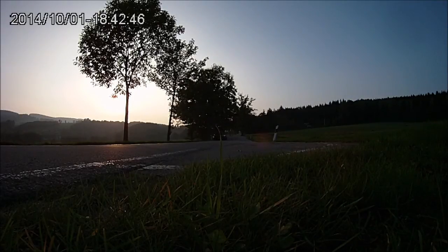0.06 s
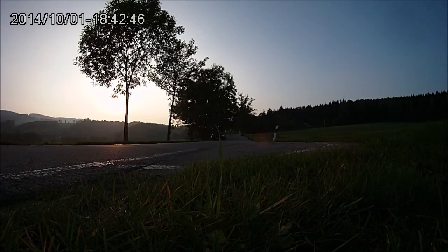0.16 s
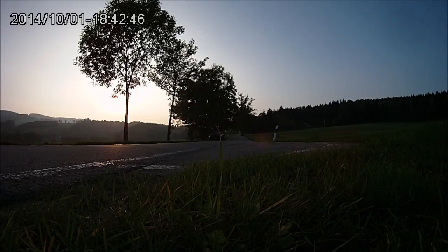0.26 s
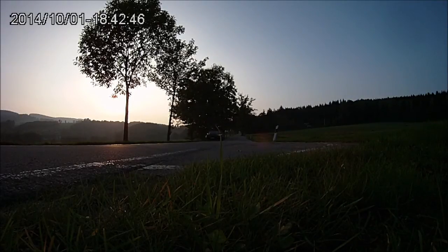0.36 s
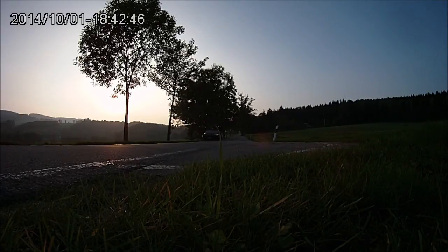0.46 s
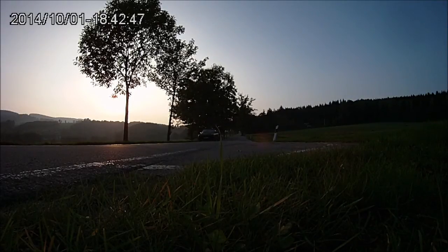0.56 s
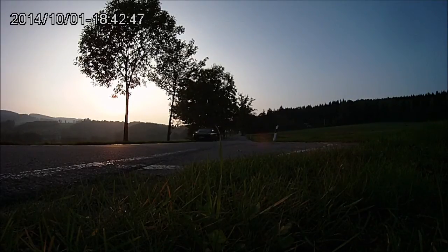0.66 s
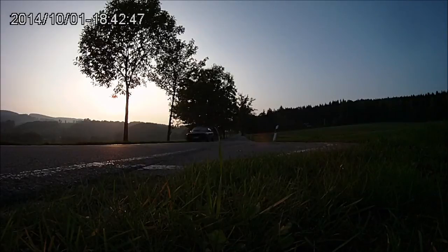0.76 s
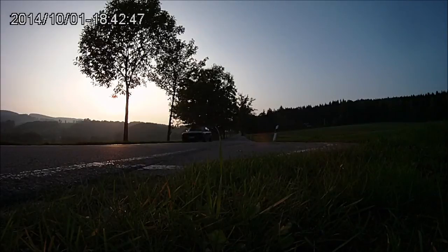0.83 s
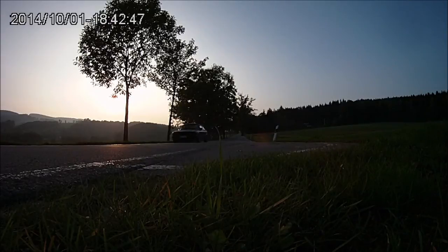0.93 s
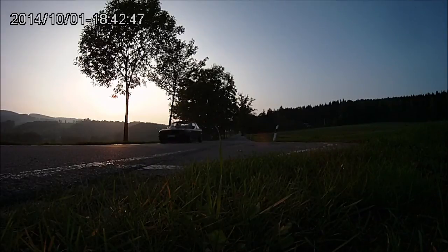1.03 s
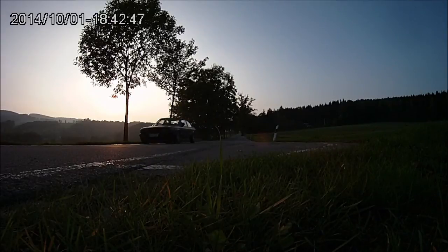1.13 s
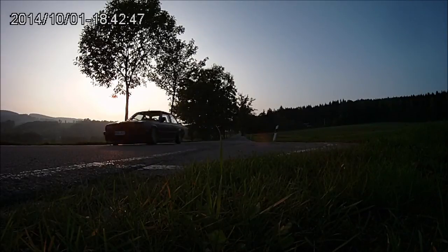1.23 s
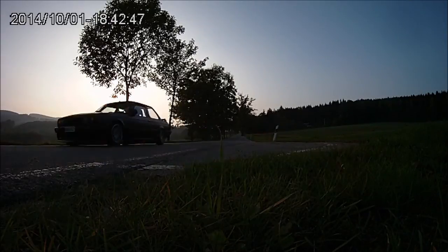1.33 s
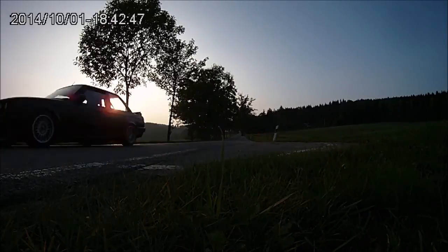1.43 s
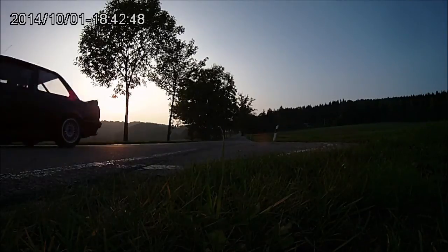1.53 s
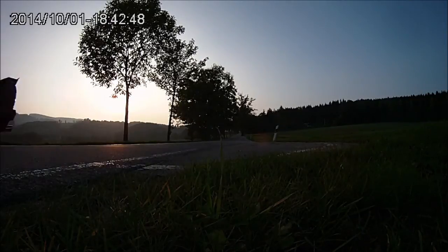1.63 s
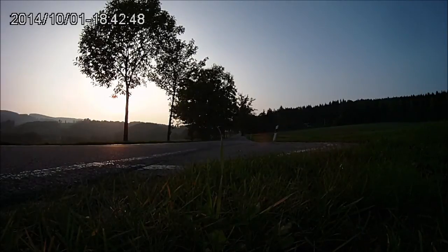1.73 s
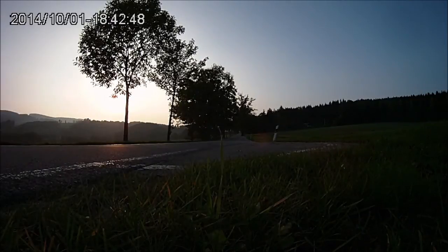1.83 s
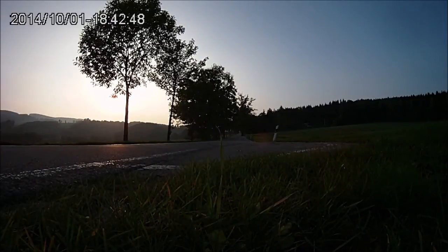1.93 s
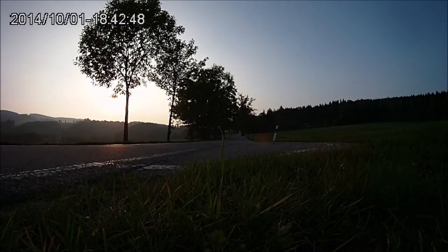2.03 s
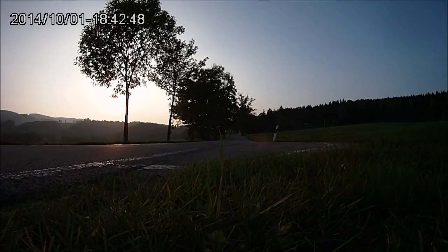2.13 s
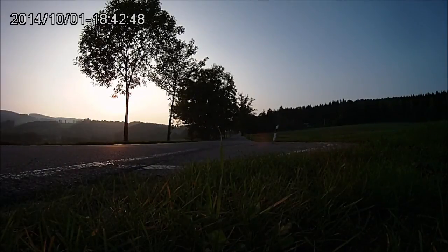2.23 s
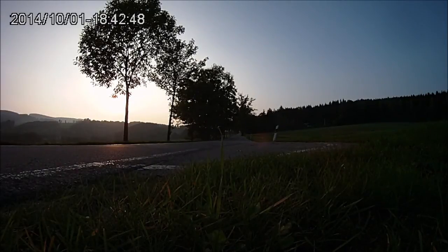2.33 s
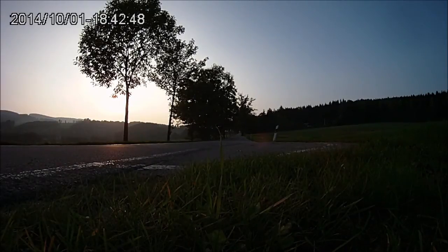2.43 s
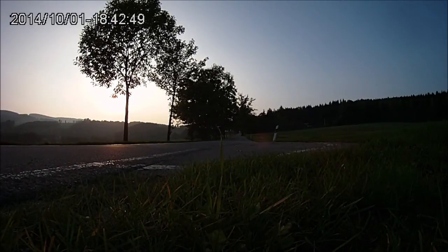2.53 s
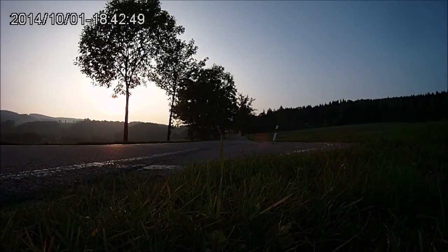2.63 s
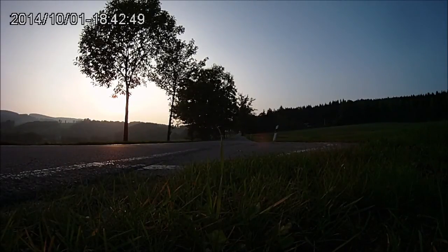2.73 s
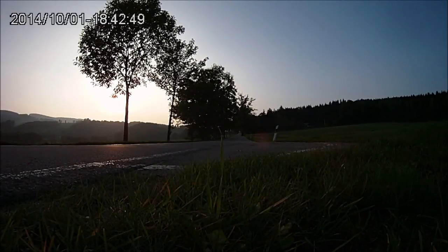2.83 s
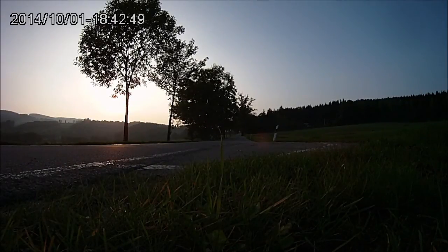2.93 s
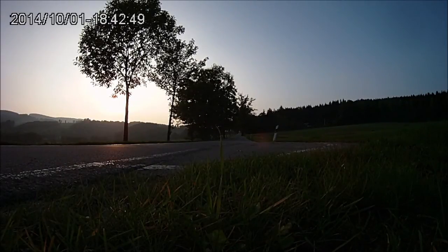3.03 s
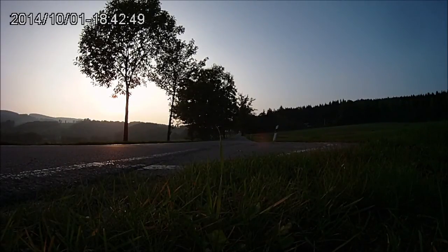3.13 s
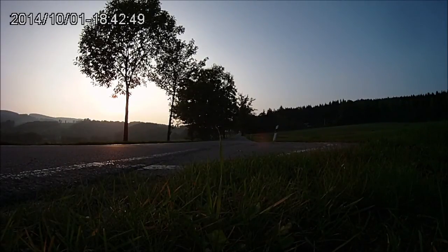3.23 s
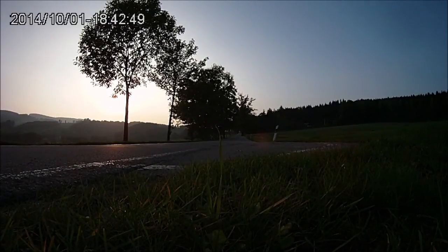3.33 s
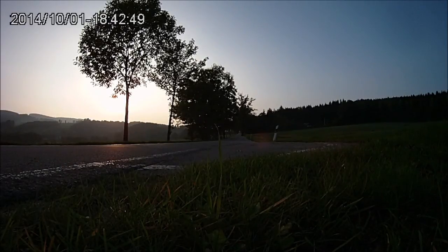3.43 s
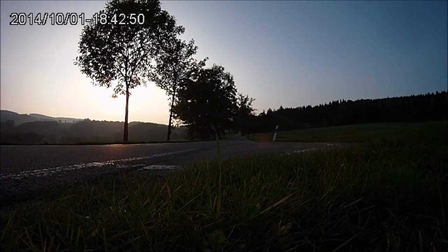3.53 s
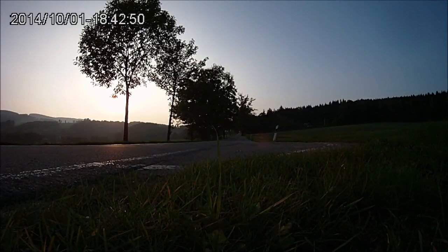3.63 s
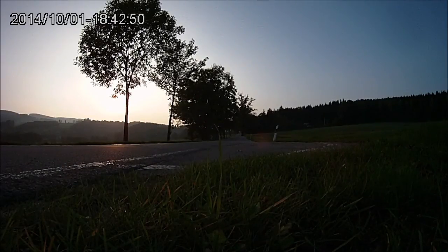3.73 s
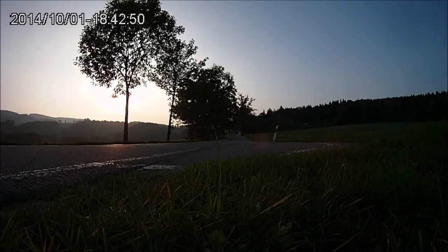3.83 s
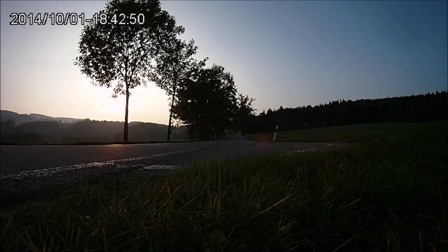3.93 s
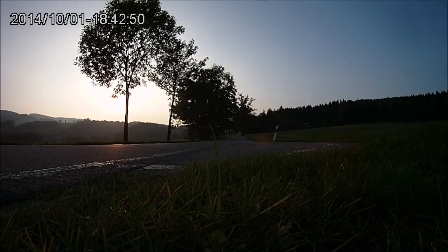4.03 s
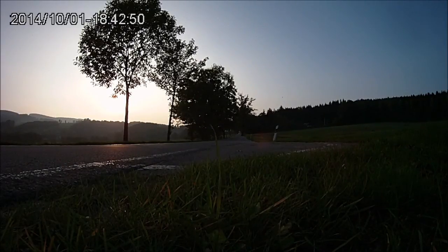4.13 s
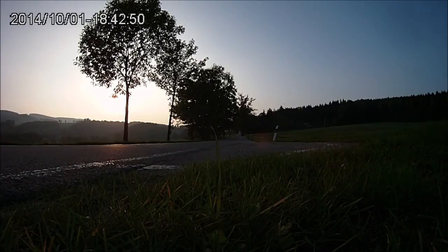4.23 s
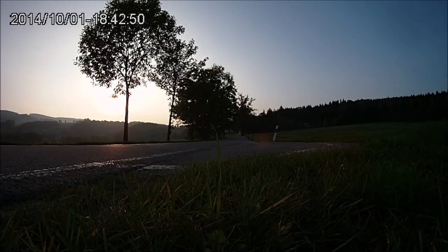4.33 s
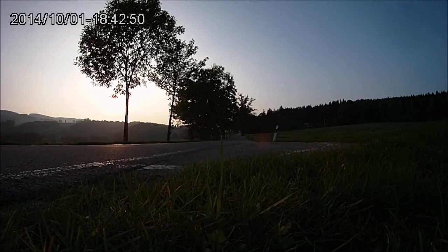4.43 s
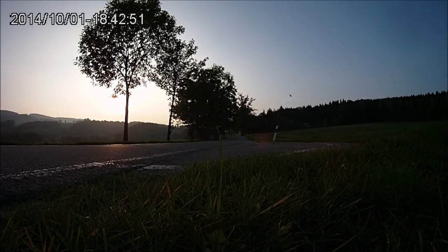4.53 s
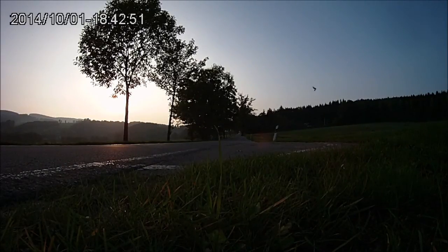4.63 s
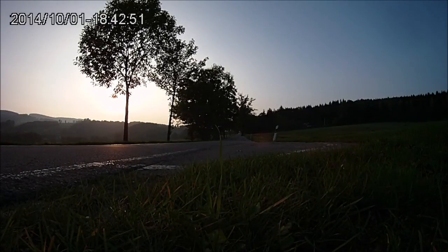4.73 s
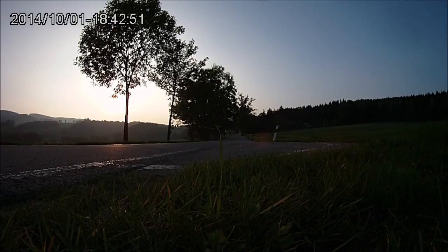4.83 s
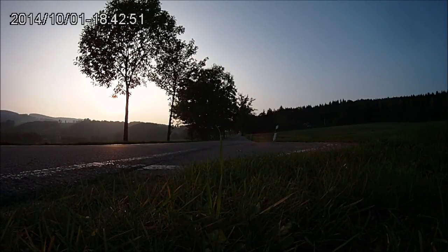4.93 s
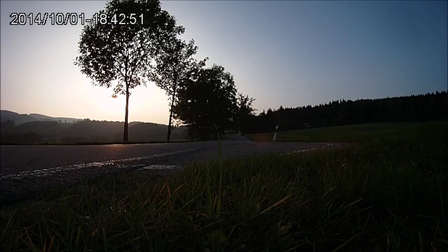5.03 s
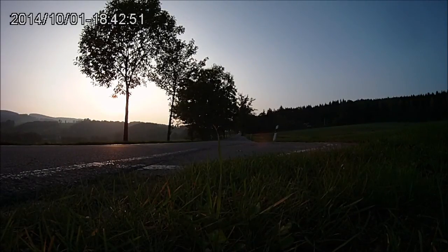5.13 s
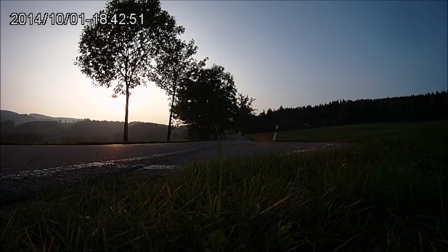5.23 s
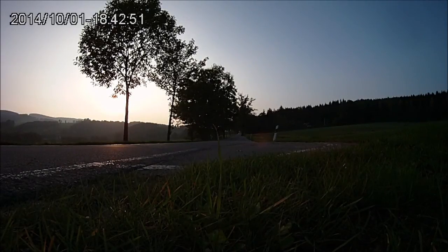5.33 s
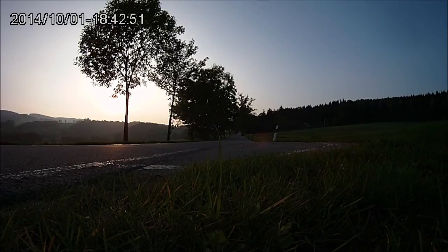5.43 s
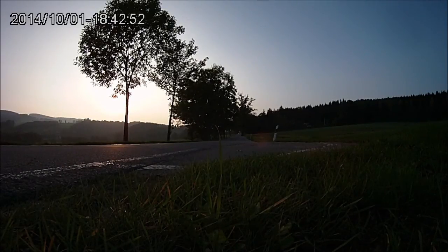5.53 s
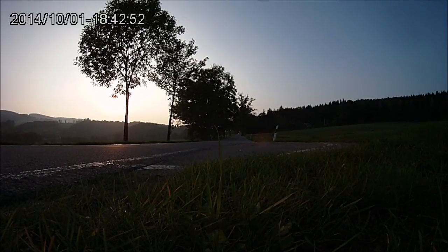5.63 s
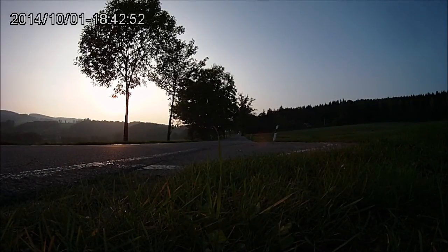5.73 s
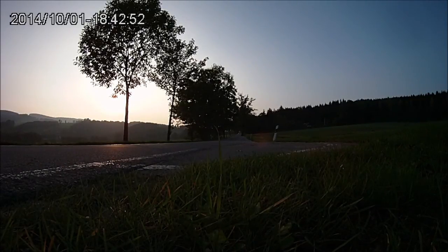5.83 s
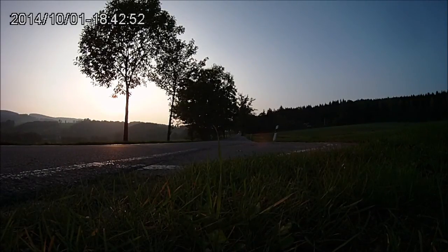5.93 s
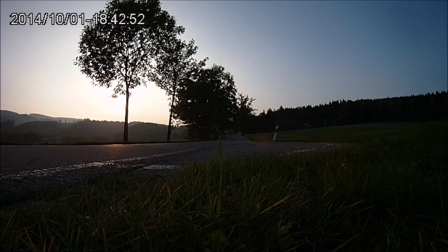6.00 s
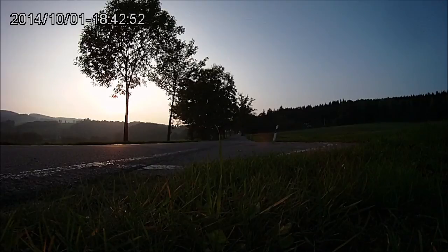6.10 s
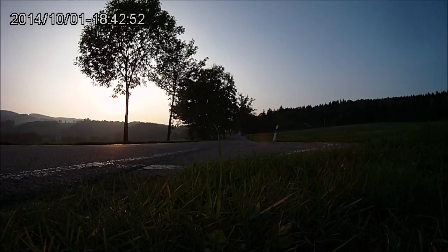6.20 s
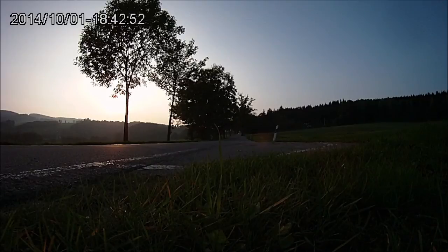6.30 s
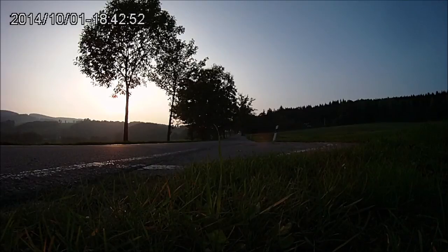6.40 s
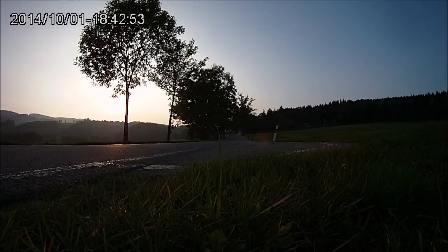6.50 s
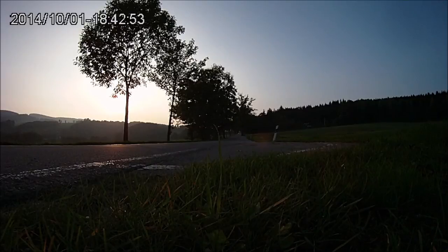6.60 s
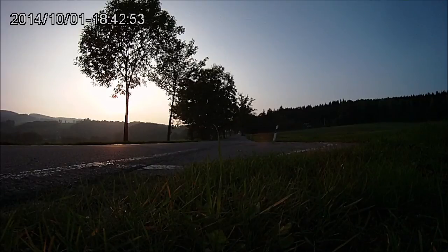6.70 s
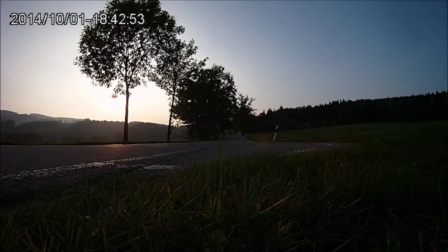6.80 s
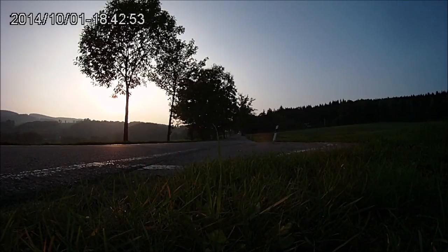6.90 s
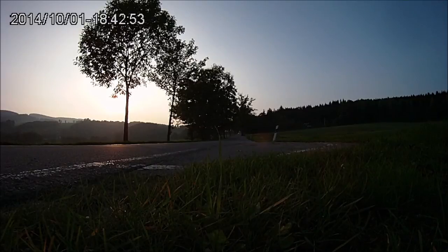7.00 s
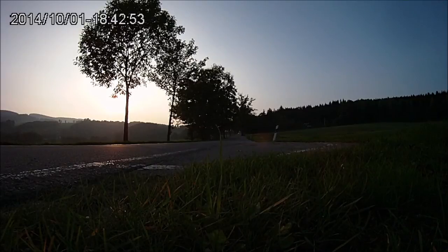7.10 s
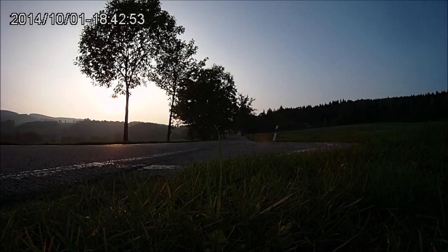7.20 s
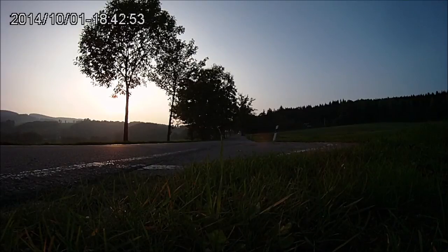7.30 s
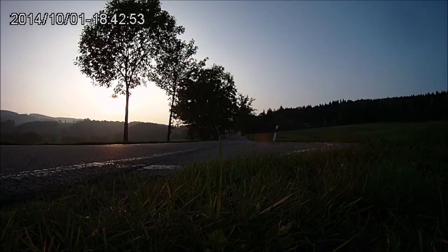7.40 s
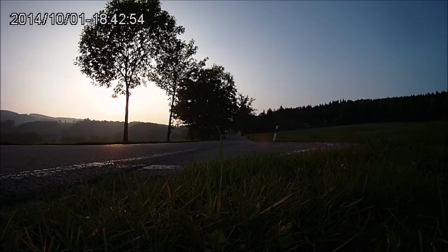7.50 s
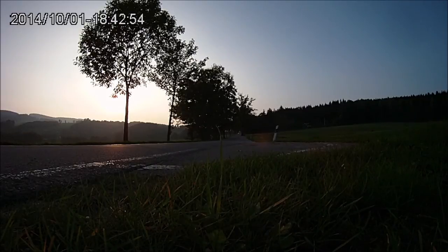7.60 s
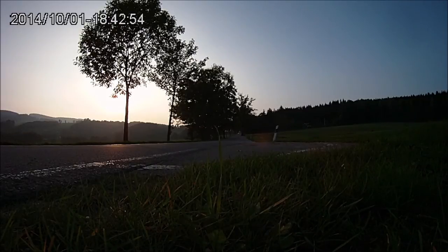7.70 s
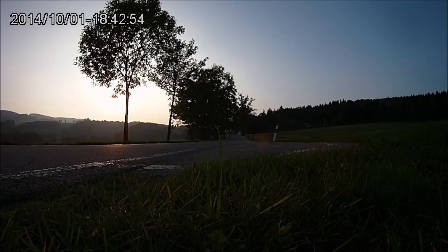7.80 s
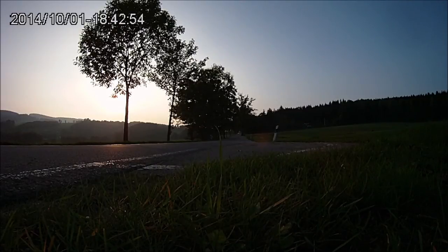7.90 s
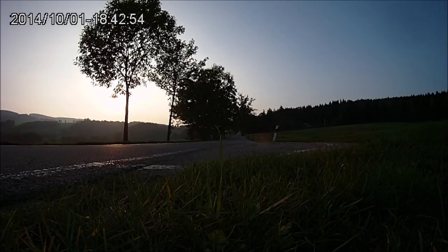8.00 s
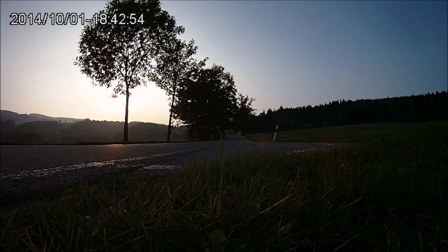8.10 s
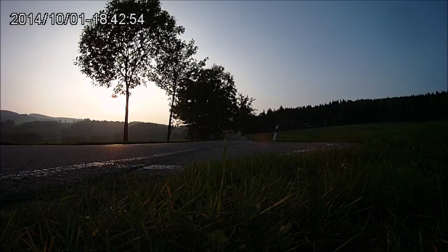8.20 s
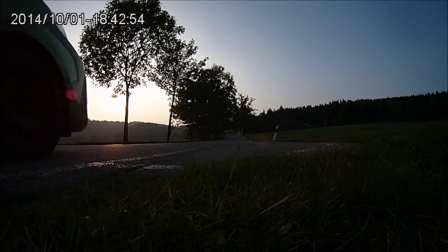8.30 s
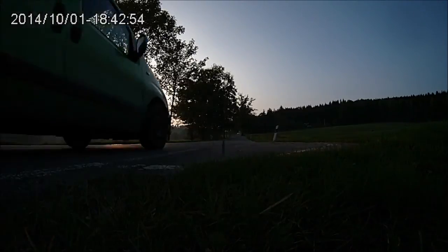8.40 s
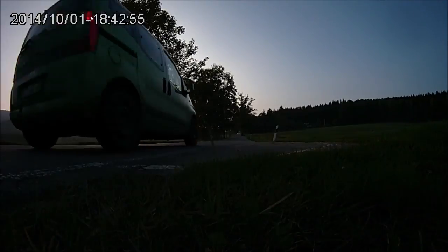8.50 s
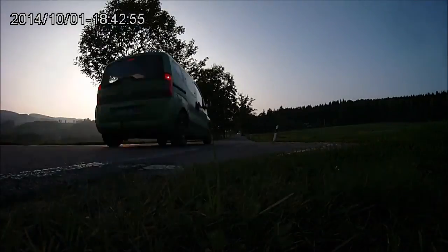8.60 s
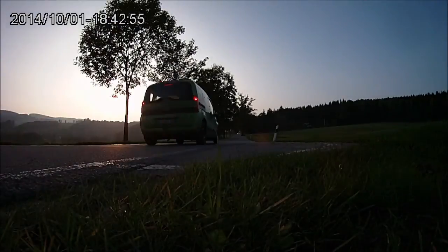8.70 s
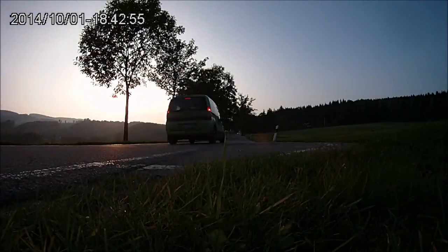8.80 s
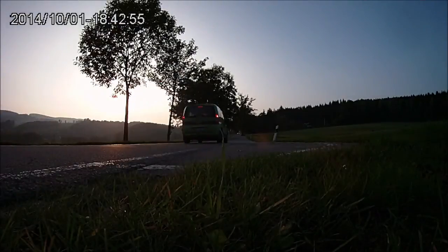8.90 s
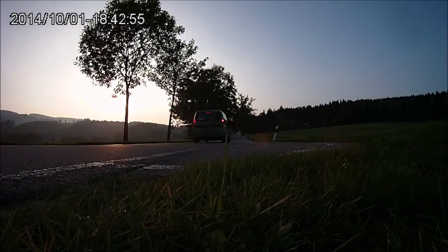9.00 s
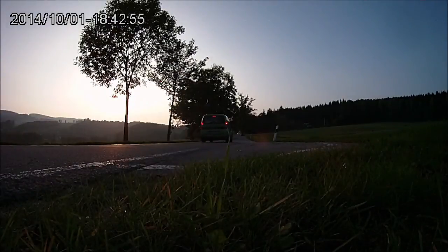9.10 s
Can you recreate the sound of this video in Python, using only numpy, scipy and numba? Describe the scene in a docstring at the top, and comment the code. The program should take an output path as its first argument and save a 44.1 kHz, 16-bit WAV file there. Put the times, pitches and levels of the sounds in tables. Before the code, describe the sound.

A car with a loud, throbbing exhaust roars past on a country road, burbles and pops, then drones away before another car whooshes by.

```python
"""Loud V8, then an ordinary car

A V8 accelerates past on a country road, lifts off with a burble, then drones away, picking up again with one pop.
Its exhaust is a stack of harmonics with surges, cracks and ringing pops; its tyres are coloured noise.
Then an ordinary car passes the other way, almost all tyre noise, over the faint noise of open land.
A gain control turns the loud parts down, and a limiter catches the hardest firings.
"""
import sys
import numpy as np
from scipy import signal
from scipy.fft import rfft, irfft, next_fast_len
from scipy.io import wavfile
from scipy.ndimage import uniform_filter1d, map_coordinates
from numba import njit

SR = 44100
rng = np.random.default_rng(int(sys.argv[2]) if len(sys.argv) > 2 else 0)


def wrap_up_sound(samples):
    """Save the sound to the file named by the first command line argument, as 16-bit audio."""
    columns = np.atleast_2d(samples).T
    # keep every value between -1 and 1, then stretch to whole-number steps
    tamed = np.clip(columns, -1, 1)
    steps = np.round(tamed * 32767).astype(np.int16)
    wavfile.write(sys.argv[1], SR, steps)


N = 403515
T = np.arange(N) / SR  # time of every sample, in seconds

# All levels below apply before the gain control.
# Four exhaust notes: multiple of the four-stroke cycle rate, relative_db
COMING_NOTE = [(1, -33), (2, -30), (3, -32), (4, -29.5), (5, -16), (6, -14.5), (7, -10), (8, -0.5),
               (9, -17.5), (10, -7), (11, 3), (12, -1), (13, -2), (14, -17.5), (15, -12.5), (16, -6),
               (17, -11), (18, -13.5), (19, -18.5), (20, -20.5), (21, -25.5), (22, -36.5), (23, -23.5),
               (24, -30), (25, -27.5), (26, -32.5)]
PASSING_NOTE = [(1, -28.5), (2, -25.5), (3, -26.5), (4, -30.5), (5, -17), (6, -9), (7, -2.5), (8, 0.5),
                (9, -17), (10, -23), (11, 4), (12, -16), (13, -19), (14, -16), (15, -11), (16, -2.5),
                (17, -30.5), (18, -20), (19, -11), (20, -35.5), (21, -32), (22, -32), (23, -28), (24, -35),
                (25, -35), (26, -16.5)]
COASTING_NOTE = [(1, -48.5), (2, -31), (3, -24.5), (4, -16), (5, -15), (6, -14.5), (7, -14.5), (8, -0.5),
                 (9, -26), (10, -18.5), (11, -12.5), (12, -27.5), (13, -28), (14, -19), (15, -18),
                 (16, -21), (17, -16), (18, -29.5), (19, -29.5), (20, -33.5), (21, -28.5), (22, -34),
                 (23, -33), (24, -33), (25, -40.5), (26, -36)]
LEAVING_NOTE = [(1, -48.5), (2, -39), (3, -28), (4, -30.5), (5, -14), (6, -33.5), (7, -32), (8, 0),
                (9, -21), (10, -18.5), (11, -38), (12, -25), (13, -29.5), (14, -27.5), (15, -31.5),
                (16, -15.5), (17, -31.5), (18, -29), (19, -25.5), (20, -30.5), (21, -34), (22, -26.5),
                (23, -35), (24, -24), (25, -42.5), (26, -41)]
# Exhaust timbre over time: time_s, position among the four notes (held within 0 to 3), firing_note_over_throb_db
TIMBRE = [(0, -3, -8), (1.3, 0, -2.5), (1.85, 1.9, 0.5), (2.45, -0.35, -2), (3, 2, -3.5), (3.8, 2.5, 8),
          (4.5, 2.5, 10.5), (5.3, 3, 11), (6.5, 3.5, 11.5), (7.5, 2, 11)]
# Exhaust pipe resonances: pitch_hz, width_hz, relative_db
PIPE_RINGS = [(60, 17, 3), (100, 11, -3), (132, 17, -15), (175, 21, -2), (247, 30, -6.5)]
# Unburnt fuel popping in the pipe: start_s, peak_db
FUEL_POPS = [(2.52, -16), (2.575, -4), (2.644, -10), (2.718, -11), (2.827, -12.5), (2.885, -20),
             (2.902, -7), (2.917, -14), (4.62, -11.5)]
# V8 revs as heard: time_s, firing_rate_hz
FIRING_RATE = [(0, 136.5), (.45, 139.9), (1, 144.8), (1.6, 148), (1.79, 145.7), (1.9, 139.4), (2.4, 135.6),
               (2.85, 126.6), (3.3, 120.7), (3.7, 113.2), (4.55, 107.8), (5.1, 106.8), (5.4, 109.8),
               (6, 112.7), (6.9, 117.5), (7.6, 120.3), (8.4, 125), (9.15, 132)]
# The V8 pulls, lifts off, coasts and pulls again: time_s, throb_level_at_nearest_point_db
ENGINE_EFFORT = [(0, -3.5), (.25, -4), (.6, -0.5), (1.3, 4), (1.85, 3), (2.2, 1.5), (2.45, -12), (3, -6.5),
                 (4.5, -8.5), (4.8, -9.5), (5.08, -9.5), (5.3, -5), (6.5, -8.5), (7.1, -13), (7.8, -14.5),
                 (9.15, -8)]
# The hardest firings: middle_s, surge_db
HARD_BANGS = [(1.521, 10), (1.739, 16), (1.908, 14.5), (2.024, 15)]

# Edges of the four tyre bands (roar, tread, sizzle, hiss): edge_hz
TYRE_EDGES = [380, 800, 1800, 4000, 15500]
# Tyre colours, each band later scaled as a whole: pitch_hz, relative_db_per_hz
V8_FRONT_COLOUR = [(380, -1.5), (450, -3.5), (610, -8), (760, -4), (1000, -2), (1280, -1), (1820, -18),
                   (2300, -21.5), (2810, -24), (4000, -37), (5200, -37.5), (6200, -42.5), (7200, -40.5),
                   (12000, -45), (15000, -54.5)]
V8_REAR_COLOUR = [(380, -7.5), (570, -2), (700, -5.5), (900, -4.5), (1120, -1), (1360, -8), (1740, -23),
                  (2400, -28.5), (2800, -36), (3300, -38), (4400, -41.5), (5300, -49), (15000, -55.5)]
CAR_FRONT_COLOUR = [(380, -11), (570, -6.5), (800, -2.5), (1020, -1.5), (1380, -11), (1740, -24),
                    (2000, -22), (2800, -32.5), (3600, -38), (4600, -34), (5400, -42), (9000, -40.5),
                    (15000, -44.5)]
CAR_REAR_COLOUR = [(380, -14), (450, -8.5), (660, -9.5), (1170, -3.5), (1600, -15), (2200, -30.5),
                   (2850, -27.5), (3400, -32.5), (4000, -39), (5400, -31), (6200, -37), (7200, -32.5),
                   (9200, -35.5), (15000, -46)]
# Tyre bands, one row each: level_abreast_db, horn_gain_along_road_db, rearward_bias_db
V8_TYRE_BANDS = [(-15, 4, -2.5), (-17.5, 10, -2.5), (-32.5, 7.5, -4), (-37, -4.4, -5.5)]
CAR_TYRE_BANDS = [(-24, 11.03, -.3), (-23, 10.6, -0.5), (-42.5, 14.3, 1.6), (-46, 3, -0.5)]
# Body rumble colour of the second car: pitch_hz, relative_db_per_hz
RUMBLE_COLOUR = [(25, -12), (60, -8), (130, -2), (260, -1), (370, -3), (450, -20.5), (700, -53)]
# Air pushed by the second car's nose and tail: middle_s, level_db
AIR_PUSHES = [(8.33, -27), (8.72, -27)]
# Grit flicked by a tyre: start_s, peak_db, pitch_hz, width_hz
GRIT_TICKS = [(2.689, -38, 9500, 7020), (8.758, -5, 750, 900)]
# Colour of the open land: pitch_hz, relative_db_per_hz
FIELD_COLOUR = [(25, 4), (60, 3.5), (130, 2), (300, -3.5), (450, -8), (1000, -9.5), (1800, -27.5),
                (3500, -32), (5500, -37.5), (7400, -38.5), (7850, -33.5), (8300, -38.5), (15000, -39)]

CYLINDERS = 8
PHASE_WAVER = .18  # random drift of each throb harmonic, in radians
STUMBLE_S, STUMBLE_WIDTH_S, STUMBLE_DEPTH = 4.648, 0.037, 0.95
# Off throttle the engine burbles; OVERRUN_S is how long after the lift it starts to fade
LIFT_S, OVERRUN_S, OVERRUN_ATTACK_S, OVERRUN_RELEASE_S, OVERRUN_DB = 2.333, .6, 0.23, 0.3, -4.5
UNEVEN_DB = -22  # uneven combustion under load, relative to the exhaust
# The strongest cylinder surges once a cycle while the tailpipe points at the microphone
STRONG_FIRING_S, SURGE_DB, SURGE_CENTRE_S, SURGE_SPREAD_S = 1.908, 9, 1.87, 0.47
# When each car is nearest, and how long it takes to drive its nearest distance
V8_PASS_S, V8_SWING_S = 1.78, .25
CAR_PASS_S, CAR_SWING_S = 8.394, 0.2
# Second car: engine pitch at the source, speed as a share of the speed of sound, levels abreast
CAR_HZ, CAR_MACH, CAR_ENGINE_DB, CAR_RUMBLE_DB = 65.7, .105, -30, -22
GUST_WIDTH_S = 0.083
# The second car screens the distant V8 as it goes by
SCREEN_DB, SCREEN_WIDTH_S = -10, 0.18
FIELD_DB = -40.5
# Gain control: the mean level it holds loud sound to, and its averaging time
GAIN_TOP_DB, GAIN_WINDOW_S = -11.5, .16
LIMITER_RELEASE_S, TOP_HZ = .04, 15200


def v8(gas_pulse=0.14, near_s=1.88, near_width_s=0.65, surge_hz=130, surge_push=0.96):
    """Exhaust, weaker by 1 / distance, plus pops and tyres; close up, the gas rushes once a firing."""
    firing_hz, = curves(FIRING_RATE)
    effort = undb(curves(ENGINE_EFFORT)[0])
    position, note_db = curves(TIMBRE)
    far, bearing = passing(V8_PASS_S, V8_SWING_S)
    # count engine cycles, with a whole number at the strong firing
    cycle = np.cumsum(firing_hz) / SR / CYLINDERS
    cycle = cycle - np.interp(STRONG_FIRING_S, T, cycle)

    near = np.exp(-((T - near_s) / near_width_s) ** 2)
    gas_beat = 1 + gas_pulse * near * np.cos(2 * np.pi * CYLINDERS * cycle)
    road = gas_beat * tyres(V8_TYRE_BANDS, V8_FRONT_COLOUR, V8_REAR_COLOUR, far, bearing,
                            falloff_db=32, flicker_db=1.02, turn_bearing=0.37, turn_width=.35)

    surge, cracks = hard_firings(cycle, firing_hz)
    note = exhaust(cycle, position, note_db)
    # a surge pushes harder but carries no deep bass
    extra = (note + surge_push) * surge
    extra = extra - uniform_filter1d(extra, int(SR / surge_hz))
    load = effort * np.hypot(1, undb(note_db))
    tailpipe = effort * (note + extra + cracks) + burble(cycle, load)
    road = ground_echo(road, -bearing, lag_s=0.00046, sweep=.1, share=0.19)
    return tailpipe / 10 ** far + pops() + road


def exhaust(cycle, position, note_db, bank_lag=.021, waver_db=2.0):
    """Eight firings a cycle: a firing note with overtones, and a throb because one bank's pulses arrive late."""
    tables = (COMING_NOTE, PASSING_NOTE, COASTING_NOTE, LEAVING_NOTE)
    notes = undb([np.array(table)[:, 1] for table in tables])
    # size the harmonics against all but the firing note itself
    without_firing = np.delete(notes, CYLINDERS - 1, axis=1)
    shares = notes / np.linalg.norm(without_firing, axis=1, keepdims=True)
    bank = np.array([0, 1, 0, 0, 1, 0, 1, 1])  # side of the engine that fires, in order
    arrivals = np.arange(CYLINDERS) / CYLINDERS + bank_lag * (bank - .5)
    states = np.arange(len(notes))
    note, throb = 0, rasp(cycle)
    for k in range(1, notes.shape[1] + 1):
        turn = 2 * np.pi * k * cycle
        if k % CYLINDERS == 0:
            note = note + np.interp(position, states, notes[:, k - 1]) * np.cos(turn)
        else:
            offset = np.angle(np.exp(-2j * np.pi * k * arrivals).sum())
            size = np.interp(position, states, shares[:, k - 1])
            size = size * (1 + (undb(waver_db) - 1) * walk(9))
            throb = throb + size * np.cos(turn + offset + PHASE_WAVER * walk(14))
    # the engine stumbles as the throttle reopens
    firing = 1 - min(STUMBLE_DEPTH, 1) * np.exp(-((T - STUMBLE_S) / STUMBLE_WIDTH_S) ** 2)
    return np.sqrt(2) * firing * (note * undb(note_db + 0.65 * walk(13)) + throb)


def rasp(cycle, rasp_db=-19, firing_db=7, near_s=1.31, near_width_s=0.72):
    """Close up, higher cycle harmonics rattle too, strongest on multiples of the firing rate."""
    k = np.arange(24, 36)
    turn = np.linspace(0, 1, 2048)
    waves = np.cos(2 * np.pi * (np.outer(k, turn) + rng.random((len(k), 1))))
    shape = undb(firing_db * (k % CYLINDERS == 0)) @ waves
    near = np.exp(-((T - near_s) / near_width_s) ** 2)
    return unit(np.interp(cycle % 1, turn, shape)) * undb(rasp_db + 1.2 * walk(6.1)) * near


def hard_firings(cycle, firing_hz, width_s=0.0019, crack_s=0.0021, crack_db=-33, scatter_db=1.0):
    """The strongest cylinder surges as the tailpipe swings by, with thin cracks: (extra gain, cracks)."""
    # time from the nearest strong firing
    off_s = (cycle - np.round(cycle)) * CYLINDERS / firing_hz
    swing = np.exp(-((T - SURGE_CENTRE_S) / SURGE_SPREAD_S) ** 2)
    surge_db = (SURGE_DB + scatter_db * walk(17)) * swing
    # in its own cycle, a listed bang replaces the usual surge
    for s, db in HARD_BANGS:
        this_cycle = np.round(cycle) == np.round(cycle[int(s * SR)])
        surge_db = np.where(this_cycle, db, surge_db)
        off_s = np.where(this_cycle, T - s, off_s)
    size = np.abs(undb(surge_db) - 1)
    crackle = noise([(2000, 7.5), (6000, 0.0), (15000, -6.0)], 1500, TOP_HZ)
    cracks = size ** .7 * np.exp(-(off_s / crack_s) ** 2) * crackle
    return size * np.exp(-(off_s / width_s) ** 2), cracks * undb(crack_db)


def burble(cycle, load):
    """Firings are randomly too strong or too weak and ring the pipe, most of all off throttle."""
    since = T - LIFT_S
    attack = np.clip(since / OVERRUN_ATTACK_S, 0, 1)
    overrun = attack * np.exp(-np.maximum(since - OVERRUN_S, 0) / OVERRUN_RELEASE_S)
    count = np.floor(CYLINDERS * cycle)
    firings = np.diff(count, prepend=count[0]) * rng.standard_normal(N)
    return unit(pipe(firings)) * (load * undb(UNEVEN_DB) + overrun * undb(OVERRUN_DB))


def pops():
    """Unburnt fuel goes off and rings the pipe."""
    pulses = np.zeros(N)
    for s, db in FUEL_POPS:
        pulses[int(s * SR)] = undb(db)
    return pipe(pulses) / np.abs(pipe(signal.unit_impulse(SR))).max()


def pipe(pulses, muffler_hz=320):
    """The exhaust pipe rings; the muffler takes the treble."""
    ringing = sum(undb(db) * ring(pulses, hz, width) for hz, width, db in PIPE_RINGS)
    return lowpass(ringing, muffler_hz, order=6)


def tyres(bands, front, rear, far, bearing, falloff_db, flicker_db, turn_bearing, turn_width):
    """Noise beams along the road, fades by falloff_db per tenfold distance, turns from front to rear colour."""
    behind = .5 + .5 * np.tanh((bearing - turn_bearing) / turn_width)
    out = 0
    for lo, hi, (db, horn_db, rear_db) in zip(TYRE_EDGES, TYRE_EDGES[1:], bands):
        band = np.sqrt(1 - behind) * noise(front, lo, hi) + np.sqrt(behind) * noise(rear, lo, hi)
        beam_db = horn_db * bearing ** 2 + rear_db * bearing
        out = out + band * undb(db - falloff_db * far + beam_db + flicker_db * walk(35))
    return out


def second_car(engine_falloff_db=14, rumble_falloff_db=24):
    """A quiet engine whose pitch drops as it passes, body rumble, two pushes of air, and tyres."""
    far, bearing = passing(CAR_PASS_S, CAR_SWING_S)
    hz = CAR_HZ / (1 + CAR_MACH * bearing)
    engine = np.sqrt(2) * np.sin(2 * np.pi * np.cumsum(hz) / SR)
    engine = engine * undb(CAR_ENGINE_DB - engine_falloff_db * far + 1.5 * walk(8.7))
    rumble = noise(RUMBLE_COLOUR) * undb(CAR_RUMBLE_DB - rumble_falloff_db * far)
    gusts = sum(undb(db) * np.exp(-((T - s) / GUST_WIDTH_S) ** 2) for s, db in AIR_PUSHES)
    wake = unit(lowpass(rng.standard_normal(N), 12)) * gusts
    road = tyres(CAR_TYRE_BANDS, CAR_FRONT_COLOUR, CAR_REAR_COLOUR, far, bearing,
                 falloff_db=31.0, flicker_db=1.28, turn_bearing=-0.54, turn_width=.25)
    road = ground_echo(road, bearing, lag_s=0.000496, sweep=0.12, share=0.28)
    return engine + rumble + wake + road


def passing(pass_s, swing_s):
    """A straight drive past: (tenfolds of the nearest distance, bearing from -1 coming to +1 leaving)."""
    along = (T - pass_s) / swing_s
    distance = np.hypot(1, along)
    return np.log10(distance), along / distance


def ground_echo(x, facing, lag_s=0.00046, sweep=.16, share=.35, smooth_hz=2200):
    """An inverted bounce off the verge combs the treble; its notches sweep down as facing rises to 1."""
    delay_s = lag_s * (1 + sweep * facing)
    echo = map_coordinates(x, [(T - delay_s) * SR], order=3, mode="nearest")
    # keep only the treble of the bounce
    echo = echo - uniform_filter1d(echo, int(SR / smooth_hz))
    return x - share * (1 + facing) / 2 * echo


def grit():
    """Each small stone is a click that rings one resonance."""
    out = 0
    for s, db, hz, width in GRIT_TICKS:
        click = lowpass(signal.unit_impulse(N, int(s * SR)), min(1.1 * hz, TOP_HZ))
        tick = ring(click, hz, width)
        out = out - undb(db) * tick / np.abs(tick).max()
    return out


def field(hiss_db=-72):
    """Distant road noise over open land, and the microphones' own hiss on each side."""
    far = noise(FIELD_COLOUR) * undb(FIELD_DB)
    hiss_colour = [(1000, -14.0), (5000, 6), (15000, -1.5)]
    hiss = np.array([noise(hiss_colour, 30, TOP_HZ) for _ in range(2)])
    return far + undb(hiss_db) * hiss


def undb(db):
    """Decibels to gain."""
    return 10 ** (np.asarray(db) / 20)


def unit(x):
    """Scale to an rms (average strength) of 1."""
    return x / np.sqrt(np.mean(x ** 2))


def curves(rows):
    """Each column of a table, joined by straight lines in time."""
    s, *columns = np.transpose(rows)
    return [np.interp(T, s, c) for c in columns]


def walk(rate):
    """Random levels, rate of them a second, joined by straight lines; spread near 1."""
    count = int(T[-1] * rate) + 2
    return np.sqrt(3 / 2) * np.interp(T * rate, np.arange(count), rng.standard_normal(count))


def noise(points, lo=15, hi=SR / 2):
    """Noise of rms 1 with a (pitch_hz, relative_db) colour, between two steep edges."""
    size = next_fast_len(N, True)
    f = np.arange(1, size // 2 + 2) * SR / size
    hz, db = np.transpose(points)
    colour = undb(np.interp(np.log(f), np.log(hz), db))
    gain = colour / np.sqrt((1 + (lo / f) ** 20) * (1 + (f / hi) ** 20))
    return unit(irfft(rfft(rng.standard_normal(size)) * gain)[:N])


def ring(x, hz, width):
    """One resonance, gain 1 at its centre."""
    return signal.lfilter(*signal.iirpeak(hz, hz / width, fs=SR), x)


def lowpass(x, hz, order=2):
    """Smoothly removes what lies above hz."""
    return signal.sosfilt(signal.butter(order, hz, fs=SR, output="sos"), x)


def highpass(x, hz, order=3):
    """Smoothly removes what lies below hz."""
    return signal.sosfilt(signal.butter(order, hz, "high", fs=SR, output="sos"), x)


def microphones(x, treble_db=-11, split_hz=3800):
    """Two close ports: alike in the bass, partly unrelated in the treble."""
    # delayed treble, added on the left and taken away on the right
    side = undb(treble_db) * highpass(np.roll(x, SR // 100), split_hz, order=4)
    return x + side * np.array([[1], [-1]])


def scene():
    """Both cars on one road in open land."""
    screen = undb(SCREEN_DB * np.exp(-((T - CAR_PASS_S) / SCREEN_WIDTH_S) ** 2))
    return microphones(v8() * screen + second_car() + grit()) + field()


def gain_control(x):
    """Turns both sides down smoothly as their mean level nears and passes the set one."""
    mean = uniform_filter1d(np.abs(x).mean(axis=0), int(GAIN_WINDOW_S * SR))
    over = mean / undb(GAIN_TOP_DB)
    return x / np.sqrt(np.hypot(1, over ** 2))


@njit
def peak_hold(x, attack, release):
    """Overload above full scale, caught fast and let go slowly."""
    out, held = np.empty(len(x)), 1.
    for i in range(len(x)):
        over = max(x[i], 1.)
        held += (over - held) * (attack if over > held else release)
        out[i] = held
    return out


def record(dry, attack_s=0.000067):
    """Gain control holds the loud level, the limiter ducks after each overload; the top is cut."""
    held = gain_control(dry)
    attack, release = min(1 / (attack_s * SR), 1.), 1 / (LIMITER_RELEASE_S * SR)
    limited = held / peak_hold(np.abs(held).max(axis=0), attack, release)
    # round off the peaks that remain
    rounded = limited / (1 + limited ** 10) ** (1 / 10)
    return signal.sosfilt(signal.ellip(10, .2, 80, TOP_HZ, fs=SR, output="sos"), rounded)


dry = scene()
out = record(dry)
wrap_up_sound(out)
```